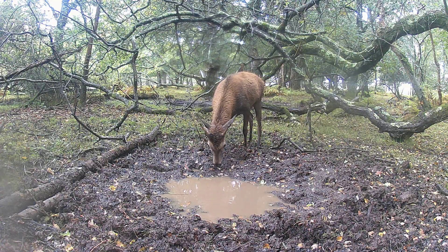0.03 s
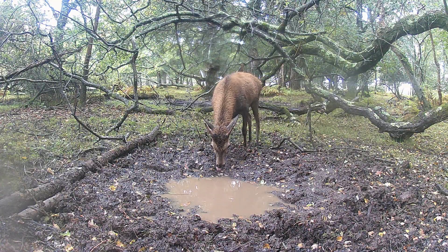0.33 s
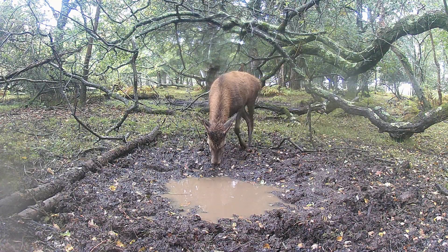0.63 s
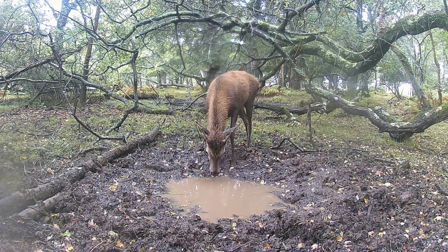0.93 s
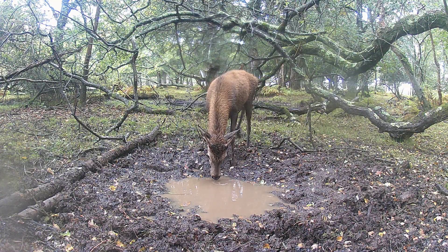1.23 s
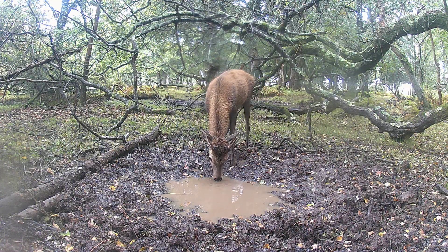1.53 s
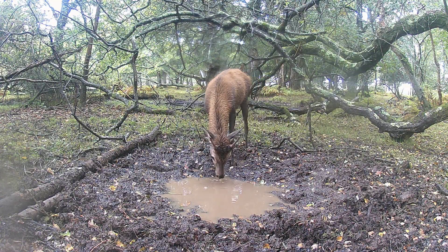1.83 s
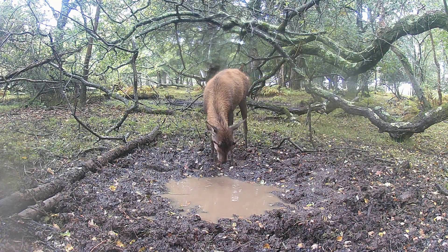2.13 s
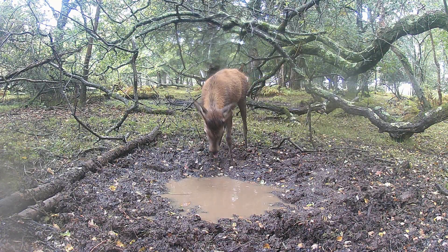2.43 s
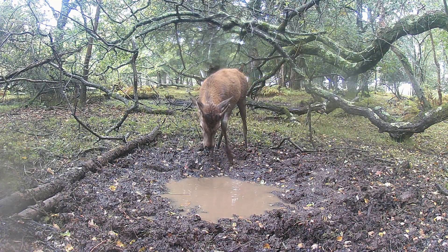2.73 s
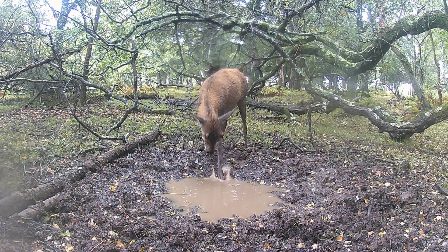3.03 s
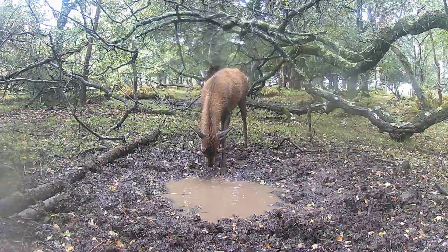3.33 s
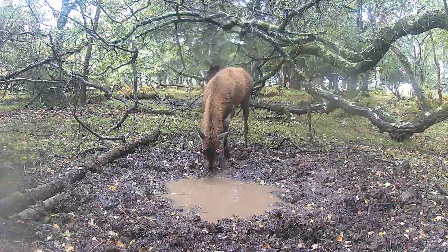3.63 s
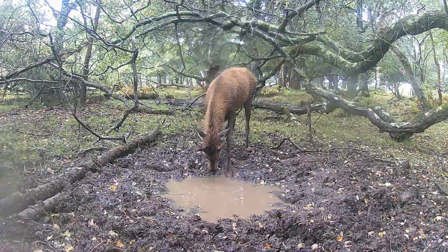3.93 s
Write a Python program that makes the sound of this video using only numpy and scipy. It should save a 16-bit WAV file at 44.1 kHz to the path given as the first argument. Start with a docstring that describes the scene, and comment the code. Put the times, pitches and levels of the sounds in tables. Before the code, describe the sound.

Wet mud squelches softly under a deer, with small water plops over outdoor hiss.

```python
"""A deer noses and steps about a muddy woodland puddle, over outdoor hiss and a far engine's drone.
First the mud squelches, as clusters of tiny bursts ring wet cavities, and hooves thud softly.
From 1 s flung drops plop into the water, each leaving a ringing bubble, among sparser squelches.
From about 2.5 s air pockets pop and the squelches crowd together; after a lull comes a last sharp
cluster near 3.9 s. The trees answer each sound with a faint tail."""
import sys
import numpy as np
from scipy import signal
from scipy.fft import rfft, irfft
from scipy.io import wavfile
from scipy.ndimage import uniform_filter1d

SR = 44100
rng = np.random.default_rng(int(sys.argv[2]) if len(sys.argv) > 2 else 0)


def to_wav(s):
    """Save 16-bit WAV."""
    ch = np.atleast_2d(s).T  # columns
    pcm = np.round(np.clip(ch, -1, 1) * 32767)  # PCM
    wavfile.write(sys.argv[1], SR, pcm.astype(np.int16))


N = 176400


def amp(db):
    """Amplitude ratio of a level in decibels."""
    return 10 ** (np.asarray(db) / 20)

def unit(x):
    """Normalisation to rms 1."""
    return x / np.sqrt(np.mean(x ** 2) + 1e-20)

def curve_at(points, hz):
    """Interpolation on a logarithmic frequency axis."""
    f, value = np.transpose(points)
    return np.interp(np.log(hz + 1), np.log(f + 1), value)

def add(mix, start, sound):
    """Superposition of a sound from a start time in seconds."""
    part = mix[max(0, round(start * SR)):][:len(sound)]
    part += sound[:len(part)]

def seconds(size):
    """Time axis."""
    return np.arange(size) / SR

def wander(t, hz, count=16):
    """Slow modulation of rms 1: sinusoids of random phase, with frequencies up to hz."""
    rates = np.geomspace(hz / 5, hz, count)
    return unit(sum(np.sin(2 * np.pi * (f * t + rng.random())) / np.sqrt(f) for f in rates))

def filtered(x, hz, kind="band"):
    """Maximally flat filter with edges at hz."""
    return signal.lfilter(*signal.butter(2, hz, kind, fs=SR), x)

def colour(x, points, size=4096):
    """Minimum-phase filter with the given gain curve."""
    log_gain = np.log(amp(curve_at(points, abs(np.fft.fftfreq(size, 1 / SR)))))
    taps = np.fft.ifft(np.exp(np.conj(signal.hilbert(log_gain)))).real
    return signal.oaconvolve(x, taps[:size // 2])[:N]


# Engine firing rate and level: t/s, f/Hz, level/dB
ENGINE_FIRING = [(0, 81.14, -44), (0.389, 82, -51), (0.631, 81.6, -47.5), (1.462, 81.72, -50.5),
                 (2.24, 79.6, -50), (2.869, 80.12, -51.5), (3.34, 80.23, -51.5), (4, 81.05, -51.5)]
# Its harmonics: harmonic number, relative level/dB
ENGINE_HARMONICS = [(1, 0), (2, -21), (3, -28), (4, -27.5)]
def far_engine(wobble=.011, waver_db=1):
    """Periodic firing gives a harmonic series, slightly modulated in frequency and amplitude."""
    t = seconds(N)
    times, hz, db = np.transpose(ENGINE_FIRING)
    firing_hz = np.interp(t, times, hz) * (1 + wobble * wander(t, 9))
    cycles = np.cumsum(firing_hz) / SR
    tones = np.zeros(N)
    for harmonic, level in ENGINE_HARMONICS:
        gain = amp(level + waver_db * wander(t, 11))
        tones += gain * np.sin(2 * np.pi * (harmonic * cycles + rng.random()))
    return np.sqrt(2) * amp(np.interp(t, times, db)) * tones


# Spectral density of the outdoor background: f/Hz, level/dB in a 1 Hz band
AIR_SPECTRUM = [(15, -88), (28, -72), (39, -66.5), (60, -76), (110, -83), (180, -87), (240, -83),
                (320, -87), (420, -95.5), (560, -91.5), (700, -99), (1200, -102), (2000, -102),
                (2700, -100.5), (3250, -96.5), (3600, -105), (4150, -119), (5100, -129), (6400, -124),
                (7400, -124), (8400, -133)]
# Swell of its lower midrange: t/s, gain/dB
AIR_SWELL = [(0, -1), (1, 1), (1.7, -.5), (2.3, 4), (2.8, 0), (3.4, -1), (4, -5.5)]
def outdoor_air(patch_db=1.38, swell_hz=335, swell_octaves=1.3):
    """Spectrally shaped noise: rumble and hiss whose band levels drift slightly."""
    hz, t, spectra = signal.stft(rng.standard_normal(N), SR, nperseg=1024, noverlap=768)
    patches = uniform_filter1d(rng.standard_normal(spectra.shape), size=9, axis=0)
    patches = unit(uniform_filter1d(patches, size=14, axis=1))
    swell_band = np.exp(-(np.log2((hz[:, None] + 1) / swell_hz) / swell_octaves) ** 2)
    spectra *= amp(patch_db * patches + swell_band * np.interp(t, *np.transpose(AIR_SWELL)))
    noise = unit(signal.istft(spectra, nperseg=1024, noverlap=768)[1][:N])
    density = amp(curve_at(AIR_SPECTRUM, np.fft.rfftfreq(N, 1 / SR)))
    return irfft(rfft(noise) * density, N) * np.sqrt(SR / 2)


# Reverberation time of the wood: f/Hz, T60/s
REVERB_TIMES = [(200, 0.42), (1000, 0.17), (3000, 0.73), (8000, 0.86)]
def woodland(direct, scatter_db=-12.5, scatter_s=0.0043, tail_db=-18.5, size=32768):
    """Reflection: early scatter from ground and branches, then thin reverberation from the trunks."""
    t = seconds(size)
    early, late = rng.choice([-1., 1.], (2, size)) * (rng.random((2, size)) < 1 / 20)
    scatter = early * np.exp(-t / scatter_s) * (t > .002)
    hz, times, spectra = signal.stft(late * np.minimum(t / 0.03, 1), SR, nperseg=256)
    decay = amp(-60 * times / curve_at(REVERB_TIMES, hz)[:, None])
    tail = signal.istft(spectra * decay, SR, nperseg=256)[1][:size]
    echo = amp(scatter_db) * scatter / np.linalg.norm(scatter)
    echo += amp(tail_db) * tail / np.linalg.norm(tail)
    return direct + signal.fftconvolve(direct, echo)[:N]


# Soft hoof falls: t/s, relative level/dB
HOOF_FALLS = [(.535, -39.5), (.648, -30), (.674, -38)]
def hoof_thud(db, hz=168, attack_s=0.0027, decay_s=0.005, size=4096):
    """Damped impact: a hoof pushes into soft ground with a low bump and a dull churn of mud."""
    t = seconds(size)
    churn = 0.29 * unit(filtered(rng.standard_normal(size), [90, 437])) * np.exp(-t / 0.011)
    bump = np.exp(-t / decay_s) * np.sin(2 * np.pi * hz * t)
    return amp(db) * (1 - np.exp(-t / attack_s)) * (bump + churn)


# Bubbles left by drops: t/s, decay time/s, relative level/dB, f/Hz
BUBBLES = [(1.006, 0.0092, -40, 3136), (1.028, 0.014, -53.5, 3350), (1.165, 0.0064, -46, 543),
           (1.505, 0.009, -46.5, 3120), (3.054, 0.011, -40, 798), (3.115, 0.0093, -44, 1217),
           (3.142, 0.01, -45.5, 970), (3.274, 0.014, -42, 499)]
def bubble_plop(decay_s, db, hz, attack_s=.0004, octaves_per_s=5.5, size=6000):
    """Bubble resonance: a damped oscillation whose frequency rises as the bubble nears the surface."""
    t = seconds(size)
    glide_hz = hz * 2 ** (octaves_per_s * np.minimum(t, 1.5 * decay_s))
    tone = np.sin(2 * np.pi * np.cumsum(glide_hz) / SR)
    return amp(db) * (1 - np.exp(-t / attack_s)) * np.exp(-t / decay_s) * tone


# Bursting air pockets: t/s, decay time/s, relative level/dB, f/Hz, fractional rise in one decay time
AIR_POCKETS = [(2.487, 0.0072, -40, 1520, 0.2), (2.6055, .003, -23.5, 2130, 0.037),
               (2.6065, 0.0014, -27, 2800, 0.03), (3.1137, 0.0014, -24.5, 2090, 0.079),
               (3.1663, 0.0074, -33, 2200, .55), (3.221, 0.001, -27, 2640, .06),
               (3.8438, .0015, -31, 1730, 0.029), (3.85, 0.0073, -42, 1220, 0.026),
               (3.9, .0033, -26.5, 2660, 0.081)]
def pocket_pop(decay_s, db, hz, rise, attack_s=.0003, size=2048):
    """Cavity resonance: an air pocket opens with a few rising cycles and a wet snap."""
    t = seconds(size)
    glide_hz = hz * (1 + rise * np.minimum(t / decay_s, 2) ** 2)
    tone = np.sin(2 * np.pi * np.cumsum(glide_hz) / SR)
    snap = 0.089 * rng.standard_normal(size)
    return amp(db) * (1 - np.exp(-t / attack_s)) * np.exp(-(t / decay_s) ** 2) * (tone + snap)


# Clusters of bursts in the mud: t/s, decay time/s, relative level/dB, cavity f/Hz, spray gain/dB
BURST_CLUSTERS = [(.153, 0.0023, -46.5, 2440, -11), (.238, .003, -56, 3500, -16),
                  (.292, 0.0025, -53, 2100, -14), (.437, 0.0083, -63.5, 3020, -12),
                  (.464, .024, -56, 2700, -17), (.521, 0.084, -55.5, 1180, -26.5),
                  (.563, 0.026, -53, 834, -20), (.619, 0.043, -45.5, 2120, -17.5),
                  (.642, .014, -45, 2642, -20.5), (.671, 0.013, -42.5, 2600, -20),
                  (.664, 0.021, -40.5, 850, -30), (.685, 0.061, -55, 2030, -17),
                  (.868, 0.0078, -54.5, 2440, -22), (.925, 0.013, -57.5, 1708, -27),
                  (1.005, 0.015, -48.5, 1680, -19), (1.005, 0.015, -51, 583, -28),
                  (1.008, 0.049, -53, 3270, -38), (1.164, 0.011, -51.5, 2270, -22),
                  (1.183, 0.014, -59, 2200, -27.5), (1.48, 0.017, -59, 2290, -26),
                  (1.504, 0.014, -53, 3070, -29), (1.643, 0.0042, -54, 1770, -19),
                  (1.783, 0.0094, -52.5, 3000, -22), (1.938, 0.0056, -54, 1319, -18),
                  (2.069, 0.0028, -50, 1700, -6), (2.174, 0.0039, -48, 2200, -27),
                  (2.191, 0.034, -58, 2200, -20), (2.257, 0.0075, -51.5, 2300, -20),
                  (2.313, 0.0041, -48, 1700, -21), (2.322, .012, -48, 2185, -16),
                  (2.345, 0.057, -60, 1900, -24), (2.373, 0.0022, -55, 5500, -5),
                  (2.4, 0.0028, -51, 1380, -13), (2.463, 0.016, -55, 2100, -7),
                  (2.548, .004, -51.5, 2750, -16), (2.587, 0.0086, -45.5, 1530, -25),
                  (2.592, 0.0025, -47.5, 3900, -13), (2.606, 0.002, -46.5, 3900, -19),
                  (2.748, 0.0087, -55, 1180, -22), (2.959, 0.016, -47, 3315, -4),
                  (2.991, .008, -51, 1900, -10), (2.998, 0.013, -45, 2700, -19.5),
                  (3.025, 0.026, -52.5, 2180, -19), (3.054, .004, -53.5, 990, -22),
                  (3.062, .012, -56, 2940, -27), (3.088, 0.0053, -48.5, 1600, -11),
                  (3.098, 0.0049, -46.5, 2120, -24), (3.114, 0.0032, -44.5, 1600, -13),
                  (3.126, 0.04, -55.5, 2530, -9.5), (3.185, 0.013, -53.5, 3000, -18),
                  (3.208, .006, -49, 2720, -16), (3.243, 0.0044, -55.5, 3000, -8),
                  (3.27, .01, -55, 2400, -34), (3.338, 0.01, -57, 2420, -35),
                  (3.4145, 0.0028, -48.5, 3000, -30), (3.823, 0.0079, -55, 2220, -21),
                  (3.85, 0.0047, -40, 1314, -38), (3.86, .014, -55.5, 1783, -17),
                  (3.9, 0.0025, -29.5, 3500, -13), (3.91, 0.015, -53.5, 3000, -12),
                  (3.93, 0.0082, -50.5, 2310, -9.5)]
def squelch(decay_s, db, hz, spray_db, bursts_per_s=3200, spread_db=5.5, body_db=-14.5, size=6000):
    """Impulse excitation: tiny bursts ring a wet cavity and the mud's body; some escape as spray."""
    t = seconds(size)
    bursts = (rng.random(size) < bursts_per_s / SR) * rng.choice([-1, 1], size)
    bursts = bursts * amp(spread_db * np.minimum(rng.exponential(1, size), 2))
    bursts *= np.exp(-(t / decay_s) ** 1.08)
    resonator = signal.iirpeak(hz, Q=1.05, fs=SR)
    cavity = signal.lfilter(*resonator, signal.lfilter(*resonator, bursts))
    fullness = min(decay_s / 0.0091, 1)  # short clusters have less body
    body = amp(body_db) * fullness * filtered(bursts, [250, 665])
    spray = amp(spray_db) * filtered(bursts, 800, "high")
    gain = amp(db) * np.sqrt(decay_s * SR / (np.sum(cavity ** 2) + 1e-12))
    return gain * (cavity + body + spray)


# The microphone's tone, dull above about 3.5 kHz, applied to the mud sounds: f/Hz, gain/dB
MICROPHONE_COLOUR = [(100, 1.5), (1000, -7), (2500, -6), (3300, -1.5), (3800, -13), (4500, -23),
                     (5300, -28), (6500, -17.5), (7400, -20), (8500, -39.5)]
def deer_in_mud(ticks_per_s=4.7, tick_db=-67, tick_hz=2300, tick_trials=120):
    """Superposition of all that the deer stirs up, with faint random ticks of settling mud."""
    mix = np.zeros(N)
    for table, source in ((BURST_CLUSTERS, squelch), (AIR_POCKETS, pocket_pop),
                          (BUBBLES, bubble_plop), (HOOF_FALLS, hoof_thud)):
        for start, *row in table:
            add(mix, start, source(*row))
    for when, chance, strength, pitch in rng.random((tick_trials, 4)):
        tick = squelch(0.0012, tick_db + 6 * (strength - .5), tick_hz * 2 ** (pitch - .5), spray_db=-8)
        if chance * tick_trials < ticks_per_s * N / SR:
            add(mix, when * N / SR, tick)
    return colour(mix, MICROPHONE_COLOUR)


def scene():
    """The deer's direct and reflected sound adds to the background in one channel."""
    return (woodland(deer_in_mud()) + outdoor_air() + far_engine())[None]

def record(dry, cutoff_hz=8450):
    """Band limiting by a linear-phase low-pass filter."""
    taps = signal.firwin(511, cutoff_hz, window=("kaiser", 9), fs=SR)
    return signal.oaconvolve(dry, taps[None], "same")


dry = scene()
out = record(dry)
to_wav(out)
```